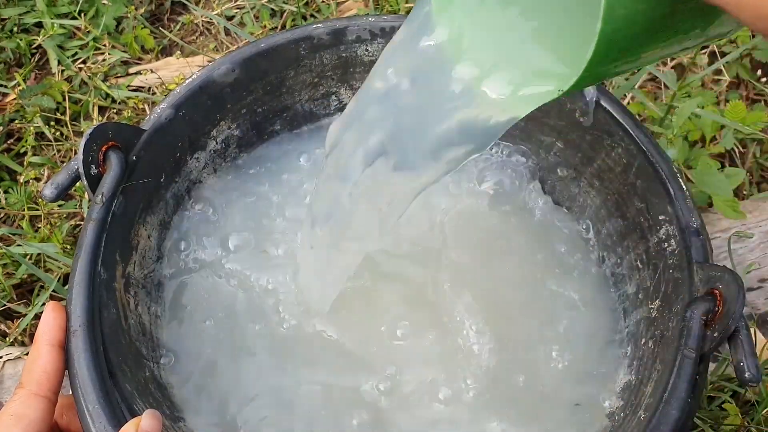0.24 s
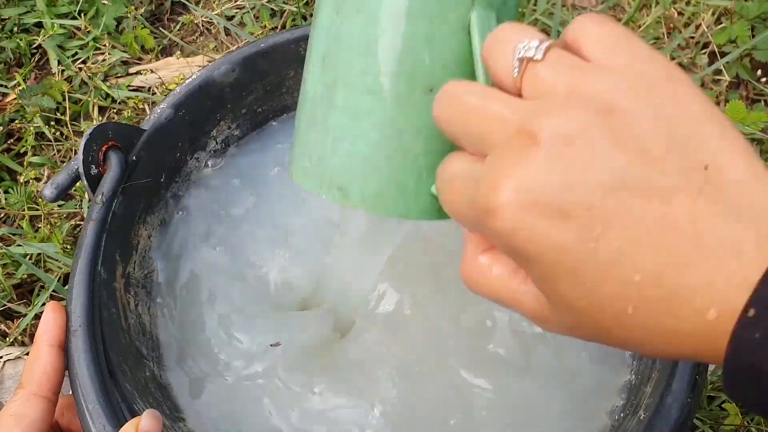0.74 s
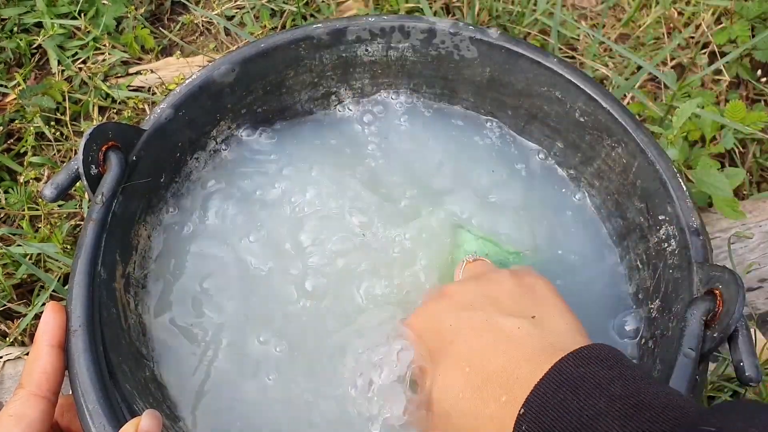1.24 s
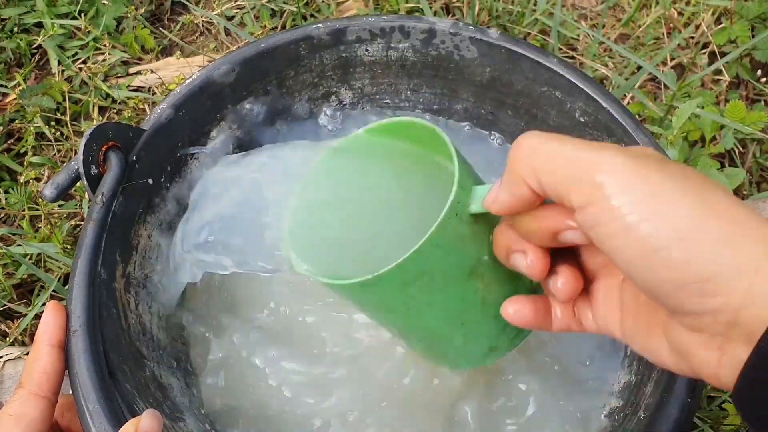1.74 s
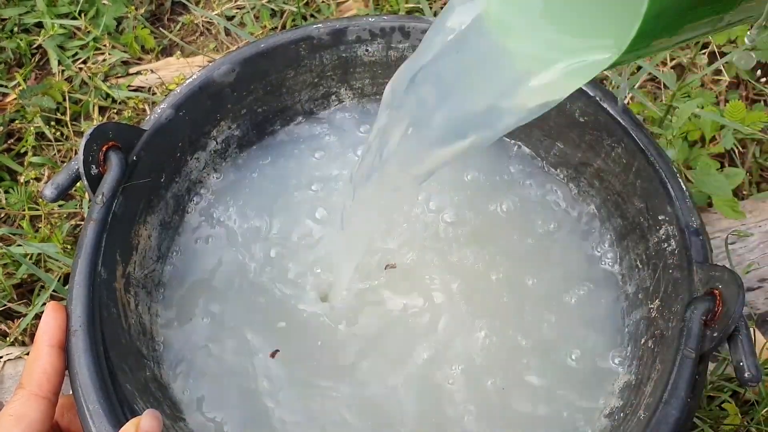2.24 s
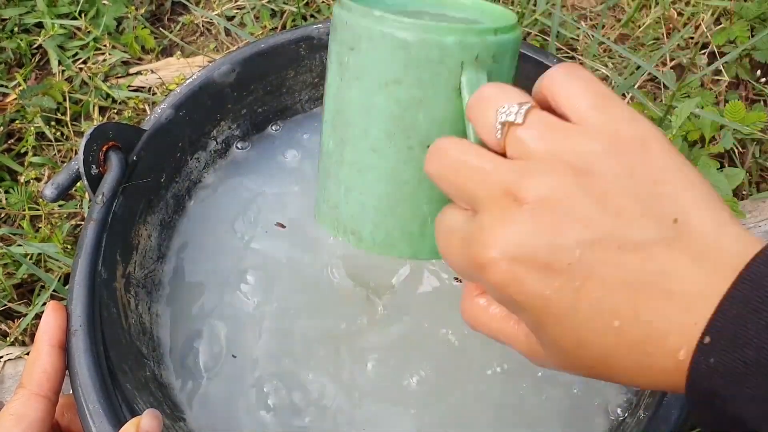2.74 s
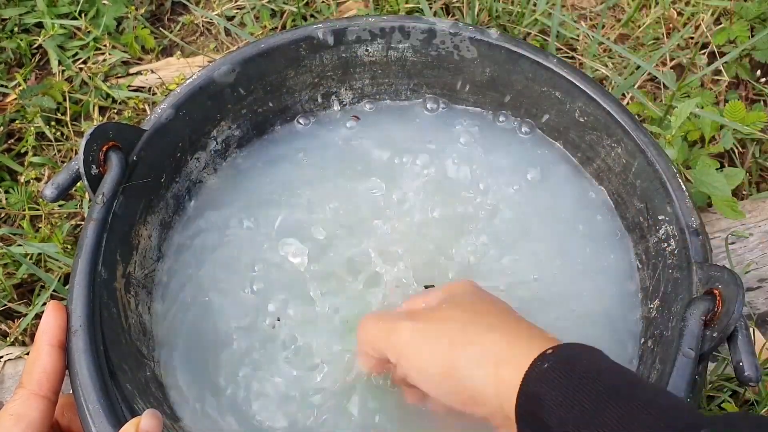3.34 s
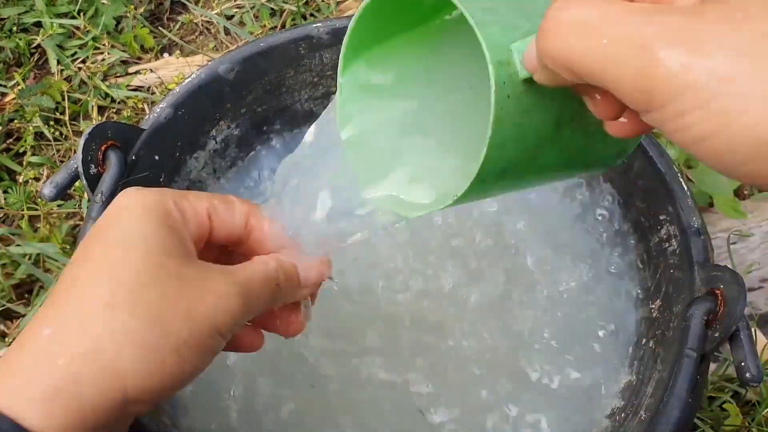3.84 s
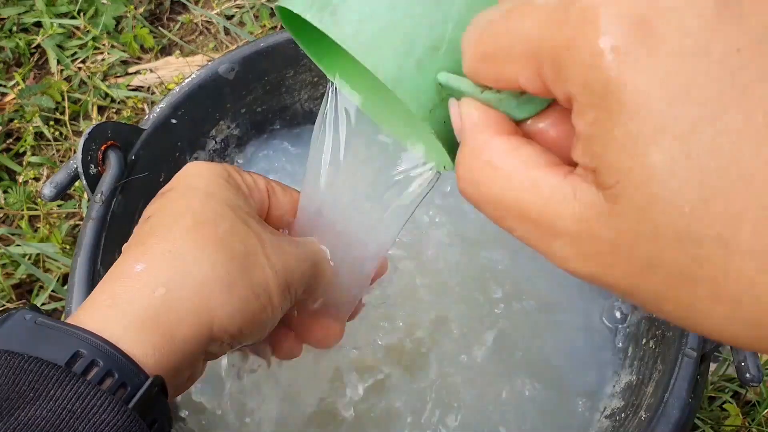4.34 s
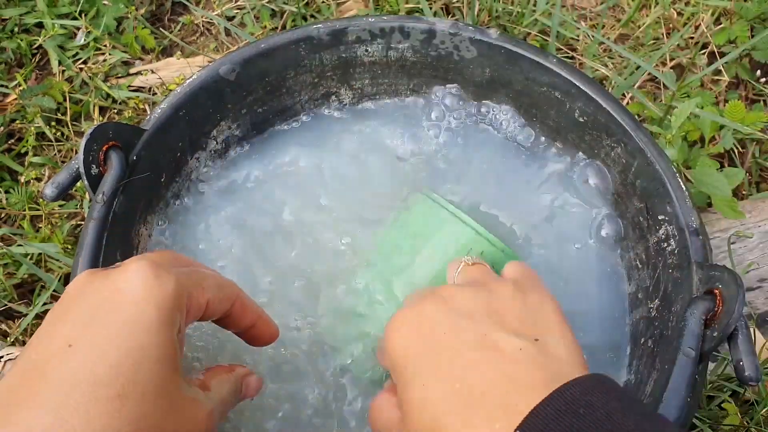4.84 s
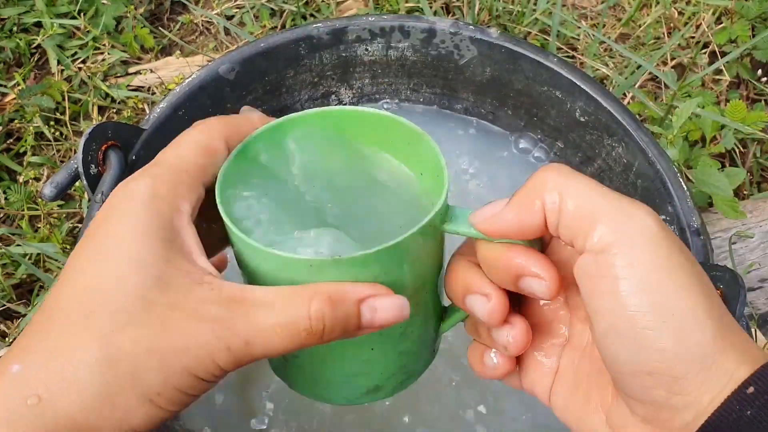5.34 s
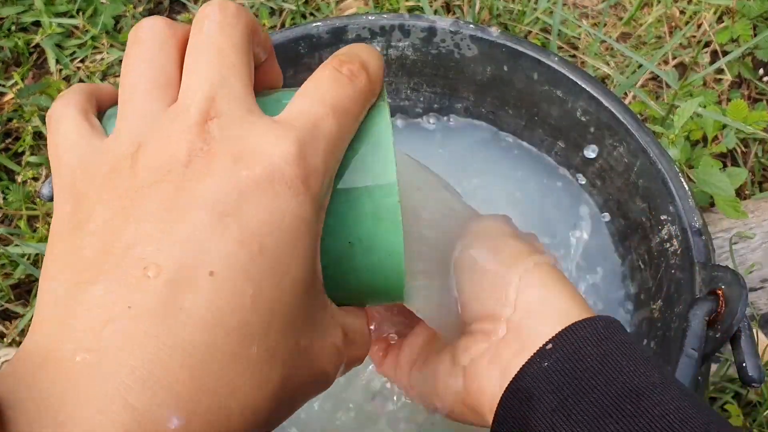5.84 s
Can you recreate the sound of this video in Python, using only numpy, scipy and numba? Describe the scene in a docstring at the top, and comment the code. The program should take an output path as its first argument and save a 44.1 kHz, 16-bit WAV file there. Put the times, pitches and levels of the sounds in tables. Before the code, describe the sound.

Outdoors and very close, water pours from a plastic mug into a full bucket, splashing with bright fizzy bubbles. The mug is dunked with low, hollow glugs, then poured again, dunked with another burst of gulps, poured, dunked more softly, and finally emptied in short splashes. Drops snap sharply throughout. A faint steady rumble lies beneath, with two tiny distant bird whistles near the end.

```python
"""Outdoors, over a steady rumble, a plastic mug pours water back into a bucket and is dunked, again and again.
It opens mid-pour; two dunks near 1 s gulp out air, a pour follows, then another gulping dunk near 3 s.
One more pour, a dunk near 4.7 s, two faint far bird whistles near 5 s, and a last pour end the scene.
Throughout, bubbles ring as sliding, dying tones, drops snap as short noise bursts,
and the stream is swarms of tiny ringing bubbles plus noise spray; the bucket adds short reflections."""
import sys
import numpy as np
from scipy import signal
from scipy.fft import rfft, irfft, next_fast_len
from scipy.io import wavfile
from scipy.ndimage import uniform_filter1d
from numba import njit

SR = 44100
rng = np.random.default_rng(int(sys.argv[2]) if len(sys.argv) > 2 else 0)


def persist_wave(psi):
    """Save psi, clipped to +-1, as 16-bit WAV."""
    counts = np.round(np.clip(psi, -1, 1) * 32767).astype(np.int16)
    wavfile.write(sys.argv[1], SR, np.atleast_2d(counts).T)


N = 268108

# steady outdoor rumble and hiss, shape only: (frequency [Hz], relative level per Hz [dB])
AIR_SHAPE = [(22, -24), (35, -11), (52, 6), (90, 2), (150, -7), (300, -20.5), (600, -36), (2000, -54),
             (6000, -22), (8500, -45), (16000, -43)]
AIR_DB = -46
# how alike the air sounds left and right: (frequency [Hz], likeness [0 to 1])
AIR_LIKENESS = [(30, 0.85), (60, 0.98), (120, 0.96), (240, 0.93), (950, 0.34), (3800, 0.055)]
# faint far bird: (time [s], length [s], start pitch [Hz], end pitch [Hz], level midway between the sides [dB])
BIRD_WHISTLES = [(4.905, .05, 6000, 5000, -57), (5.0, .08, 3900, 5100, -56)]
# reflections of the bucket wall: (frequency [Hz], level [dB])
WALL_REFLECTIONS = [(150, -63), (500, -43), (1500, -5.5), (5000, -5), (12000, -16.5)]
LEAD_S = .0001  # the bucket is nearer to the left microphone, so the right hears it this much later
# water running out of the lifted mug, one list for each pour: (time [s], fizz level [dB], churn level [dB])
POUR_LEVELS = [
    [(0.0, -25, -38.5), (0.14, -38.5, -37.5), (0.25, -40.5, -47.5), (0.41, -29.5, -26.5), (0.57, -38, -37),
     (0.84, -31, -32), (0.9, -54, -43)],
    [(1.63, -58, -50), (1.69, -38.5, -46), (2.13, -38, -35), (2.32, -38.5, -35.5), (2.42, -28.5, -31),
     (2.57, -50.5, -41), (2.8, -31, -29), (2.87, -56, -35.5)],
    [(3.45, -53.5, -48.5), (3.66, -31, -38), (3.76, -41, -43.5), (3.9, -31.5, -38), (4.0, -35, -53),
     (4.3, -24.5, -25), (4.43, -30.5, -38.5), (4.6, -27.5, -30.5), (4.69, -47, -56)],
    [(5.16, -43.5, -58), (5.29, -39, -48), (5.45, -34.5, -48), (5.51, -49, -69), (5.65, -42.5, -87),
     (5.7, -27.5, -24.5), (5.81, -31.5, -47), (5.91, -25, -38.5), (6.08, -27.5, -33)],
]
# mug pushed under, water rushing in: (start [s], length [s], fizz level [dB], churn level [dB])
DUNK_LEVELS = [(0.894, .27, -46, -43), (1.227, 0.34, -38.5, -47), (2.881, 0.44, -40.5, -38),
               (4.69, 0.36, -47.5, -52)]
RUSH_IN_S, SETTLE_DB_PER_S = 0.011, 317
TRICKLE_DB = -50.5  # faint fizz that never stops
# fine spray, shape only: (frequency [Hz], relative level per Hz [dB])
SPRAY_SHAPE = [(3800, -11.5), (6500, -10.5), (8500, -12.5), (14000, -12.5), (16000, -16)]
# level of the spray when the fizz is at SPRAY_FIZZ_DB: (time [s], level [dB])
SPRAY_LEVEL = [(0.4, -52), (1.2, -46), (1.8, -47), (2.3, -50.5), (3.2, -45), (4.0, -49.5), (4.7, -45.5),
               (5.3, -47.5), (5.9, -51.5)]
SPRAY_FIZZ_DB, SPRAY_GROWTH = -36, 1.06  # growth: dB of spray for each dB of fizz
FROTH_DB, FROTH_T60 = -19.5, 0.042  # brief churn after each large bubble: dB from its own energy, fade [s]
MIST_DB, MIST_T60 = -17, .1  # brief spray after each drop: dB from its top octave, fade [s]
# drops snapping on the surface: (time [s], peak setting [dB], top octave [dB], 60 dB fade of the spatter [s])
DROPS = [(0.0513, -8.5, -28, 0.014), (0.0915, -14.5, -3, 0.016), (0.277, -15.5, -9, 0.011),
         (0.3063, -28, -22, 0.024), (0.317, -17, -14, 0.012), (0.3579, -18, -16, 0.071),
         (0.369, -23, -8, 0.012), (0.4253, -8, -12.5, 0.016), (0.624, -18.5, -39, 0.014),
         (0.8362, -8, -11.5, 0.053), (1.2517, -14, -22.5, 0.044), (1.259, -17, -31, 0.16),
         (1.398, -14, -4.5, 0.025), (1.5189, -10.5, -5, 0.0055), (1.6615, -17.5, -15, 0.078),
         (1.7875, -17.5, -13, 0.12), (2.02, -11, -19, 0.018), (2.0842, -21, -18, 0.012),
         (2.108, -23, -27, 0.012), (2.1969, -20, -7, 0.016), (2.287, -18, -25, 0.015),
         (2.357, -19.5, -50, 0.013), (2.4496, -17.5, -7, 0.034), (2.6198, -20.5, -16, 0.016),
         (3.031, -10.5, -18, 0.0095), (3.1281, -16, -20, 0.024), (3.242, -21.5, -14, 0.015),
         (3.377, -16, -19, 0.026), (3.5692, -31, -4, 0.024), (3.635, -14.5, -34, 0.022),
         (3.7334, -20.5, -7, 0.01), (3.785, -17.5, -42, 0.019), (4.0727, -13, -15, 0.024),
         (4.181, -12, -16, 0.14), (4.2095, -9, -19, 0.27), (4.3214, -14, -30, 0.17), (4.5034, -14, 1, 0.09),
         (4.5439, -14, -23, 0.088), (4.9633, -30, -5, 0.019), (4.978, -14.5, -20, 0.042),
         (5.287, -17.5, -28, 0.26), (5.3437, -11, -11.5, 0.018), (5.374, -18, -18, 0.02),
         (5.6194, -18.5, -10.5, 0.031), (5.738, -33, -36, 0.014)]
# lower part of every drop's shape: (frequency [Hz], relative level per Hz [dB])
DROP_SHAPE = [(500, -8.5), (1500, -2), (3000, 1), (5000, 8.5), (6800, 7), (8000, -6)]
# air gulping out of the mug: (time [s], peak setting [dB], pitch [Hz], 60 dB fade [s])
AIR_GULPS = [(0.918, -17, 151, 0.039), (1.024, -19, 167, 0.11), (1.086, -15, 86, 0.11),
             (1.141, -10, 87, 0.13), (1.209, -12, 124.5, 0.15), (1.241, -9.5, 93.3, 0.11),
             (1.297, -13, 128, 0.085), (2.915, -16, 122, 0.036), (3.021, -12.5, 111, 0.035),
             (3.058, -7.5, 170, 0.026), (3.111, -11.5, 126, 0.085), (3.138, -9, 98, 0.073),
             (3.195, -12, 167, 0.075)]
GULP_RISE = 1.8  # octaves per s
# large bubbles: (time [s], peak setting [dB], pitch [Hz], 60 dB fade [s], pitch rise [octaves per s])
LARGE_BUBBLES = [(0.084, -33.5, 794, 0.16, 1), (0.133, -23, 650, 0.061, -8.5),
                 (0.194, -27.5, 818, 0.085, 13), (0.28, -8, 495, 0.0097, -15),
                 (0.384, -20, 2690, 0.054, -8), (0.424, -17, 3270, 0.026, 9),
                 (0.426, -13.5, 1920, 0.022, 8), (0.439, -27, 1427, 0.16, -14.5),
                 (0.5, -28, 726, 0.12, -38.5), (0.513, -17, 340, 0.026, -15),
                 (0.589, -27, 1264, 0.054, -11), (0.628, -12.5, 1820, 0.0078, 29),
                 (0.648, -9, 412, 0.02, 47), (0.757, -23, 605, 0.07, -5), (0.837, -6.5, 561, 0.038, -17),
                 (0.96, -12.5, 222, 0.03, -6), (0.985, -27, 848, 0.03, 0), (1.058, -18, 3230, 0.013, 30),
                 (1.076, -25.5, 884, 0.064, 0.5), (1.088, -15.5, 1180, 0.017, 44),
                 (1.14, -14.5, 369, 0.11, 22), (1.212, -2.5, 210, 0.015, 1), (1.216, -20.5, 610, 0.07, -4),
                 (1.239, -4, 635, 0.031, 96), (1.245, -25, 1870, 0.028, 41), (1.259, -5, 2990, 0.013, 120),
                 (1.269, -11.5, 1790, 0.043, 33), (1.291, -14, 2650, 0.018, 0), (1.3, 8.5, 787, 0.01, 128),
                 (1.315, -3, 845, 0.011, 110), (1.321, -13, 1860, 0.031, -7), (1.327, -21, 1540, 0.029, 63),
                 (1.337, -0.5, 2050, 0.0051, 44), (1.364, -3.5, 247, 0.029, -18),
                 (1.366, -7, 1370, 0.012, -28), (1.372, -16.5, 471, 0.11, 6.5),
                 (1.402, -1, 816, 0.012, 111), (1.408, -18, 1040, 0.05, 14), (1.415, -4.5, 1134, 0.019, 79),
                 (1.423, -15, 1960, 0.024, 75), (1.521, -8.5, 840, 0.0041, -20),
                 (1.664, -17, 1730, 0.018, -17), (1.677, -27.5, 526, 0.16, 42),
                 (1.792, -15, 640, 0.013, -7), (1.848, -24.5, 860, 0.073, 0),
                 (1.897, -13.5, 3810, 0.0084, -1), (1.958, -20, 750, 0.038, -3),
                 (1.999, -17.5, 1080, 0.024, 42), (2.045, -16.5, 557, 0.035, 26),
                 (2.337, -20.5, 1500, 0.032, -26), (2.406, -14, 1890, 0.037, -8.5),
                 (2.428, -15, 1495, 0.028, 2), (2.448, -15.5, 286, 0.047, 9), (2.645, -23, 500, 0.054, 21),
                 (2.749, -17, 2710, 0.037, -9), (2.765, -14, 519, 0.053, 23),
                 (2.771, -21.5, 820, 0.069, 5.5), (2.808, -19, 516, 0.13, -0.5),
                 (2.835, -8, 2180, 0.011, 12), (2.9, -29, 560, 0.088, -5), (3.036, -1, 677, 0.0056, -30),
                 (3.06, -13, 1430, 0.016, 13), (3.073, -9.5, 495, 0.019, -7), (3.075, -13, 1390, 0.024, 73),
                 (3.083, -9.5, 2075, 0.02, 24), (3.122, -5, 198, 0.02, -17), (3.139, 1, 800, 0.0073, -32),
                 (3.179, -19, 1960, 0.015, 2), (3.2, -6, 514, 0.043, 65), (3.211, -14, 1930, 0.013, 3),
                 (3.224, 3, 340, 0.015, -39), (3.24, -2, 485, 0.019, -23), (3.242, 2.5, 1955, 0.0083, -51),
                 (3.255, -19, 388, 0.11, 13), (3.284, 1, 563, 0.01, -22), (3.293, -7, 390, 0.028, 67),
                 (3.314, -15.5, 1150, 0.036, 15), (3.45, -15.5, 1670, 0.005, -2),
                 (3.495, -30.5, 956, 0.033, 6), (3.569, -10, 3000, 0.01, 11), (3.579, -26, 914, 0.066, 15),
                 (3.633, -24.5, 815, 0.044, -15), (3.635, -19, 4300, 0.013, 32),
                 (3.677, -17, 486, 0.017, -4), (3.683, -22, 1450, 0.024, 24), (3.725, -24, 634, 0.015, 0),
                 (3.732, -11, 4210, 0.012, -27), (3.882, -8, 3900, 0.0071, -15),
                 (3.881, -7, 727, 0.0072, 176), (3.913, -13.5, 4400, 0.015, -3),
                 (4.039, -20, 1060, 0.019, -8), (4.089, -19, 2480, 0.029, 16),
                 (4.21, -23, 1440, 0.084, 3.5), (4.212, -17, 2630, 0.082, 53),
                 (4.228, -18, 2990, 0.038, -30), (4.231, -17, 523, 0.029, 10),
                 (4.288, -17.5, 1054, 0.064, 23), (4.298, -20, 1730, 0.031, 6),
                 (4.47, -19, 1050, 0.031, 59), (4.509, -14, 1480, 0.017, -14),
                 (4.604, -18, 1114, 0.038, -13), (4.716, -13, 305, 0.014, -20),
                 (4.727, -25.5, 860, 0.034, 3), (4.815, -14, 474, 0.012, -31),
                 (4.816, -16.5, 176, 0.036, -1), (4.837, -25.5, 1680, 0.027, 28),
                 (4.838, -30, 214, 0.037, -5), (4.856, -17, 214, 0.042, -3), (4.947, -30, 542, 0.13, 18),
                 (4.964, -18.5, 2430, 0.011, 0), (4.981, -26, 675, 0.076, 20.5),
                 (5.097, -29, 680, 0.049, -1), (5.251, -26.5, 1170, 0.073, -10), (5.27, -35, 633, 0.071, 4),
                 (5.388, -23.5, 950, 0.029, 8), (5.434, -20, 1440, 0.045, 51),
                 (5.459, -18.5, 1390, 0.033, -10), (5.462, -29, 925, 0.072, 0.5),
                 (5.706, -17, 1698, 0.044, 56), (5.71, -20, 519, 0.083, 1.5), (5.755, -22, 768, 0.07, 0.5),
                 (5.833, -19, 2290, 0.06, 9), (5.888, -16, 1440, 0.032, 33),
                 (5.887, -12.5, 2055, 0.053, -16), (6.019, -6.5, 1240, 0.019, -33)]
# the right microphone is duller: (frequency [Hz], left minus right level [dB])
PORT_DIFFERENCE = [(200, 0.5), (1300, 1.5), (4400, -1), (8000, 5), (15000, 12)]
EDGE_HZ = 16000  # upper band limit


def amp(db):
    """Turn decibels into a gain."""
    return 10 ** (np.asarray(db) / 20)


def evened(x):
    """Scale a signal to an rms of 1."""
    return x / np.sqrt(np.mean(x ** 2) + 1e-20)


def read(points, hz):
    """Read a curve between its points, along a log frequency axis."""
    f, value = np.transpose(points)
    return np.interp(np.log(hz + 1), np.log(f + 1), value)


def colour(x, db_of_hz):
    """Raise or lower each frequency by the dB that the curve asks for."""
    size = next_fast_len(x.shape[-1])
    gain = amp(db_of_hz(np.fft.rfftfreq(size, 1 / SR)))
    return irfft(rfft(x, size) * gain, size)[..., :x.shape[-1]]


def add(mix, s, sound):
    """Mix a sound in at time s."""
    part = mix[max(round(s * SR), 0):][:len(sound)]
    part += sound[:len(part)]


@njit
def ring(s, gain, hz, t60, rise, lead_s, attack):
    """Pockets of air ring as dying tones that slide as they near the surface; right hears them lead_s late."""
    out = np.zeros((2, N))
    for k in range(len(s)):
        # change per sample of the pitch, the dying swing and the soft start
        slide = 2 ** (rise[k] / SR)
        fade = 1000. ** (-1 / t60[k] / SR)
        swell = np.exp(-attack * hz[k] / SR)
        for side in range(2):
            start = (s[k] + side * lead_s[k]) * SR
            first = max(int(start) + 1, 0)
            step, swing, held = 2 * np.pi * hz[k] / SR, gain[k], 1.
            phase = step * (first - start)  # starts between two samples
            for n in range(first, min(first + int(.7 * t60[k] * SR), N)):
                if step < 2:  # leave out pitches above about 14 kHz
                    out[side, n] += swing * (1 - held) * np.sin(phase)
                phase += step
                step *= slide
                swing *= fade
                held *= swell
    return out


def air():
    """Steady outdoor rumble and faint hiss: shaped noise, more alike left and right in the bass."""
    a, b = rng.standard_normal((2, N))

    def likeness(hz):
        return np.clip(read(AIR_LIKENESS, hz), .01, .999)

    shared = colour(a, lambda hz: 20 * np.log10(likeness(hz)))
    own = colour(b, lambda hz: 10 * np.log10(1 - likeness(hz) ** 2))
    both = np.array([a, shared + own])
    return amp(AIR_DB) * evened(colour(both, lambda hz: read(AIR_SHAPE, hz)))


def bird():
    """Two thin gliding whistles: sine tones, stronger on the left."""
    out = np.zeros(N)
    for s, length, start_hz, end_hz, db in BIRD_WHISTLES:
        hz = np.linspace(start_hz, end_hz, int(length * SR))
        tone = np.sin(2 * np.pi * np.cumsum(hz) / SR)
        add(out, s, amp(db) * tone * signal.windows.tukey(len(hz), .5))
    return out * amp([[3], [-3]])


def bucket(x):
    """Dense short reflections from the bucket wall, different for each microphone."""
    t = np.arange(4000) / SR
    taps = rng.standard_normal((2, 4000)) * amp(-60 * t / 0.028) * (t > .0008)
    wet = signal.oaconvolve(x, taps / np.linalg.norm(taps[0]), axes=1)[:, :N]
    return colour(wet, lambda hz: read(WALL_REFLECTIONS, hz))


def afterglow(s, power, t60):
    """Power that jumps at each event and dies away."""
    kicks = np.bincount((np.asarray(s) * SR).astype(int), power, N)[:N]
    return signal.lfilter([1], [1, -amp(-120 / t60 / SR)], kicks)


def stir():
    """Levels of churn, fizz and spray: pours and dunks add their power, bubbles and drops their wake."""
    t = np.arange(N) / SR
    power = np.zeros((2, N))  # fizz, churn
    for s, *db in map(np.transpose, POUR_LEVELS):
        power += amp([2 * np.interp(t, s, d, -99, -99) for d in db])  # doubled dB turn amplitude into power
    for start, length, *db in DUNK_LEVELS:
        rush = np.clip((t - start) / RUSH_IN_S, 0, 1)
        settle = amp(-SETTLE_DB_PER_S * np.clip(t - start - length, 0, 1))
        power += np.outer(amp(db), rush * settle) ** 2
    fizz = np.sqrt(power[0] + amp(2 * TRICKLE_DB))

    s, db, _, t60, _ = np.transpose(LARGE_BUBBLES)
    froth = afterglow(s, amp(2 * (db + FROTH_DB)) * t60 / FROTH_T60, FROTH_T60)
    churn = np.sqrt(power[1] + froth)

    s, db, top_db, _ = np.transpose(DROPS)
    mist = afterglow(s, amp(2 * (db + top_db + MIST_DB)), MIST_T60)
    spray = amp(np.interp(t, *np.transpose(SPRAY_LEVEL)))
    spray *= (fizz / amp(SPRAY_FIZZ_DB)) ** SPRAY_GROWTH
    return churn, fizz, np.sqrt(spray ** 2 + mist)


def clumps(ms, depth_db):
    """A random gain that wanders at a pace set by ms: water comes in bunches."""
    width = max(int(ms * SR / 1000), 2)
    smooth = uniform_filter1d(uniform_filter1d(rng.standard_normal(N), width), width)
    return evened(amp(depth_db * evened(smooth)))


def swarm(level, lo_hz, hi_hz, cycles, spread_db, tilt_db, glide, wander_s, attack, count):
    """Many small bubbles of random size, strength, ringing time and place in the bucket."""
    when, size, strength = rng.random((count, 3)).T
    hold, slide, place = rng.standard_normal((count, 3)).T
    hz = lo_hz * (hi_hz / lo_hz) ** size
    t60 = cycles * amp(5.5 * hold) / hz
    db = np.minimum(-spread_db * np.log(strength), 3 * spread_db)  # a few stand out, up to a cap
    db += tilt_db * np.log2(hz / lo_hz)  # tilt in dB per octave
    gain = amp(db) / np.sqrt(t60)
    # about unit rms for the whole swarm, before the level is applied
    gain /= np.sqrt(np.sum(gain ** 2 * t60) / (N / SR) / (4 * np.log(1000)))
    gain *= level[(when * N).astype(int)]
    rise = (glide + .5 * slide) / t60
    return ring(when * N / SR, gain, hz, t60, rise, LEAD_S + wander_s * place, attack)


def water():
    """Churning body, gurgle, fizz and fine spray of the stream, bunched by one clumping; ticks go unbunched."""
    churning, fizzing, spraying = stir()
    bunch = clumps(8.9, 3.15)
    churn = swarm(churning * bunch, 371.4, 1364, cycles=13.0, spread_db=5.5, tilt_db=1.0, glide=0.57,
                  wander_s=.00005, attack=0.83, count=3000)
    fizz = swarm(fizzing * bunch * clumps(5.8, 0.24), 1336, 6640, cycles=29, spread_db=3.94, tilt_db=-0.13,
                 glide=0.38, wander_s=0.00015, attack=1.0, count=9000)
    # mid-sized bubbles ring for more cycles and follow both the churn and the fizz
    gurgling = amp(-1.0) * np.sqrt(churning * fizzing) * bunch
    gurgle = swarm(gurgling, 861, 3765, cycles=46.5, spread_db=6.4, tilt_db=0.24, glide=0.15,
                   wander_s=.0001, attack=0.17, count=2600)
    mist = rng.standard_normal((2, N)) * bunch * clumps(12.0, 2.2) * clumps(1.0, 4.0)
    spray = spraying * evened(colour(mist, lambda hz: read(SPRAY_SHAPE, hz)))
    # droplets tick as bubbles of only a few swings
    ticks = swarm(amp(-13.0) * fizzing, 3020, 9800, cycles=7.2, spread_db=5.0, tilt_db=-3.1, glide=.15,
                  wander_s=.00012, attack=2.9, count=700)
    return ticks + churn + gurgle + fizz + spray


def splats():
    """Each drop is a noise burst that builds for a moment, snaps for about a millisecond, then spatters away."""
    out = np.zeros((2, N))
    before_s = .008  # room for the build-up
    t = np.arange(2048) / SR - before_s
    draws = rng.standard_normal((len(DROPS), 2049))
    for (s, db, top_db, t60), (place, *noise) in zip(DROPS, draws):
        shape = list(DROP_SHAPE) + [(9500, top_db + 13), (16000, top_db - 4)]
        snap = np.exp(-((t - .0012) / 0.00058) ** 2)
        spatter = amp(-16.5 - 60 * np.where(t > 0, t, -1.8 * t) / t60)
        hiss = evened(colour(np.array(noise), lambda hz: read(shape, hz)))
        burst = amp(db - 5) * hiss * (snap + spatter)
        add(out[0], s - before_s, burst)
        add(out[1], s - before_s + LEAD_S + .0001 * place, burst)
    return out


def satellites(count=10):
    """Every large bubble tears off a few smaller ones just before and after it."""
    s, db, hz, t60, _ = np.repeat(LARGE_BUBBLES, count, 0).T
    near, size, strength, slide, place = rng.standard_normal((len(s), 5)).T
    small_hz = np.clip(1.77 * hz * 2 ** (0.69 * size), 300, 6500)
    small_t60 = 22 / small_hz
    # long-ringing parents carry more energy, so they shed stronger ones
    gain = amp(db - 19.5 + 6.25 * strength) * np.sqrt(t60 / small_t60)
    rise = (0.32 + .5 * slide) / small_t60
    return ring(s + .014 * near, gain, small_hz, small_t60, rise, LEAD_S + .0001 * place, 0.32)


def pinched_pockets(s, db, hz, t60, rise):
    """Ringing air, plus a short, brighter slap as the water neck pinches shut and each pocket forms."""
    lead_s = LEAD_S + 0 * s
    slap = ring(s, amp(db - 10.5), 2.19 * hz, 4.0 / hz, 0 * s, lead_s, 1.4)
    return ring(s, amp(db), hz, np.maximum(t60, .002), rise, lead_s, 1.0) + slap


def glugs():
    """Low gulps of the mug that rise as its air pocket shrinks."""
    s, db, hz, t60 = np.transpose(AIR_GULPS)
    return pinched_pockets(s, db, hz, t60, GULP_RISE + 0 * s)


def bubbles():
    """Large bubbles ring and slide in pitch, with smaller ones around them."""
    s, db, hz, t60, rise = np.transpose(LARGE_BUBBLES)
    return pinched_pockets(s, db, hz, t60, rise) + satellites()


def scene():
    """Everything in the bucket with its reflections, over the bird and the air."""
    near = water() + bubbles() + glugs() + splats()
    return near + bucket(near) + bird() + air()


def record(dry):
    """Unequal microphone ports, then the band limit."""
    ports = colour(dry, lambda hz: np.outer([.5, -.5], read(PORT_DIFFERENCE, hz)))
    low_pass = signal.firwin(401, EDGE_HZ, window=("kaiser", 9), fs=SR)
    return signal.oaconvolve(ports, low_pass[None], "same")


dry = scene()
out = record(dry)
persist_wave(out)
```